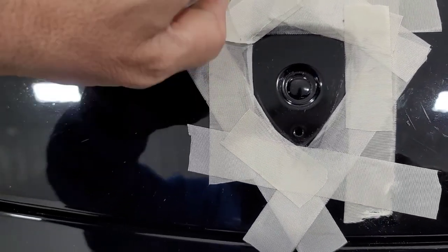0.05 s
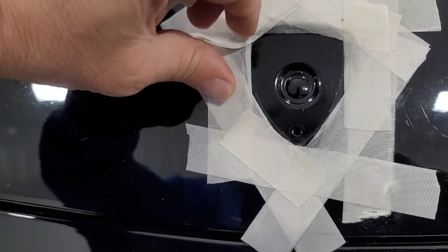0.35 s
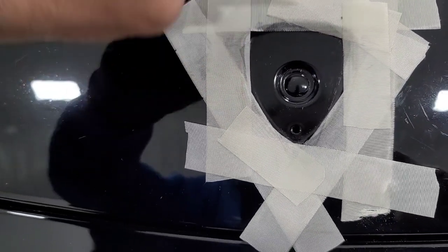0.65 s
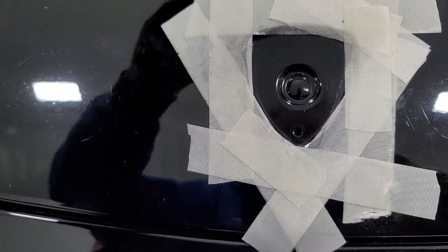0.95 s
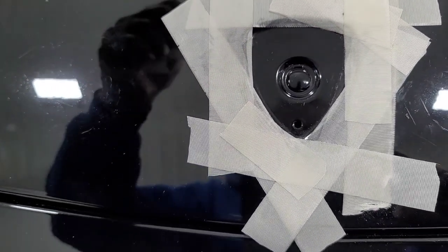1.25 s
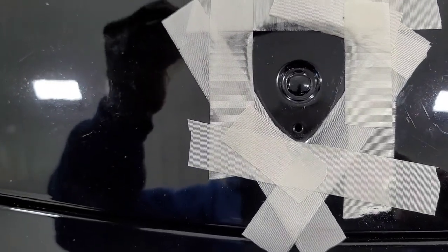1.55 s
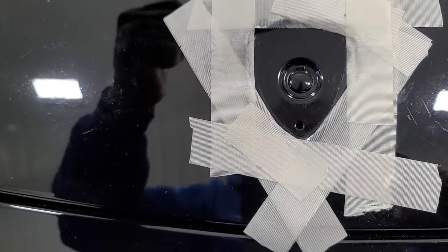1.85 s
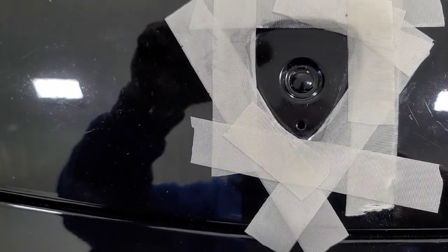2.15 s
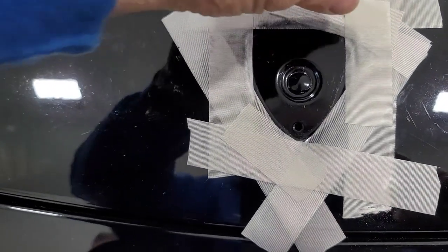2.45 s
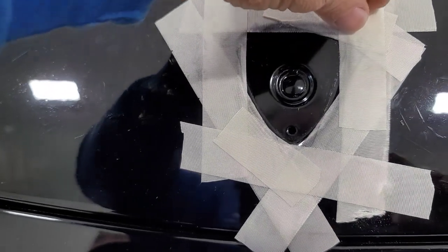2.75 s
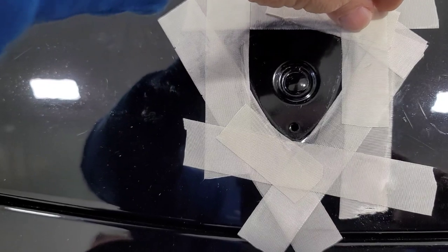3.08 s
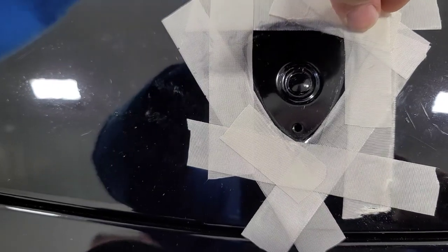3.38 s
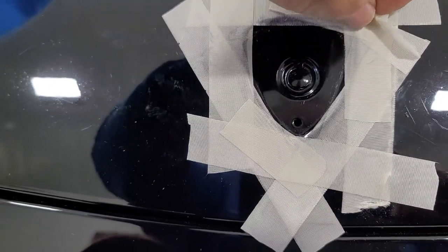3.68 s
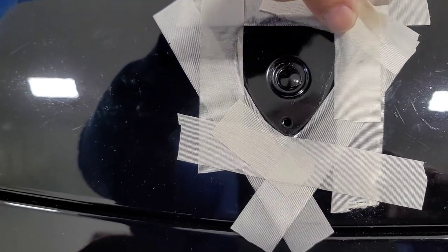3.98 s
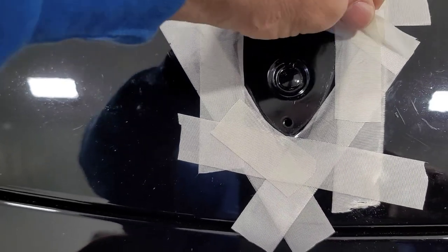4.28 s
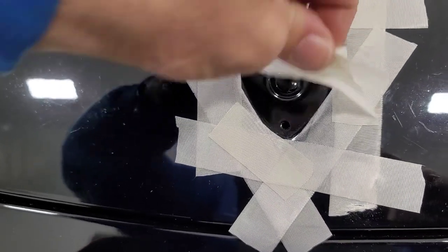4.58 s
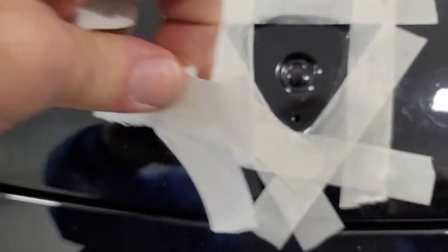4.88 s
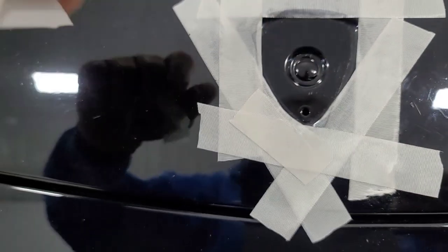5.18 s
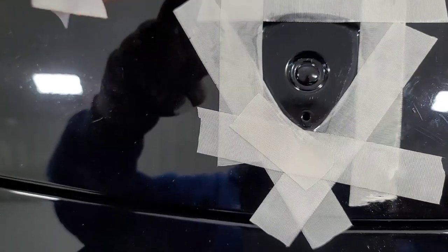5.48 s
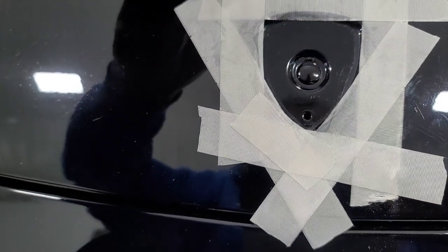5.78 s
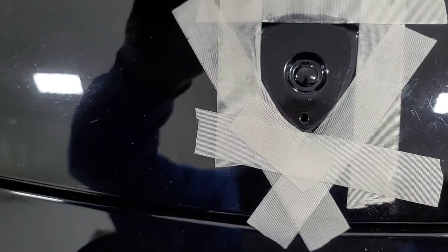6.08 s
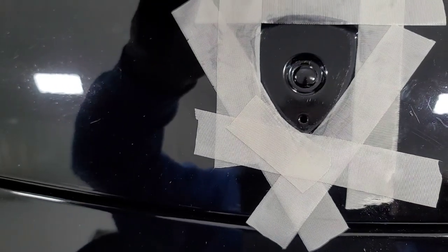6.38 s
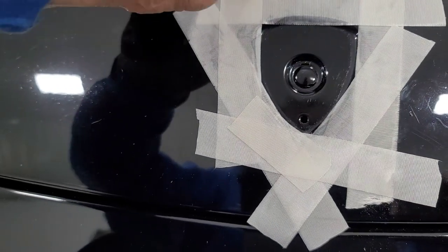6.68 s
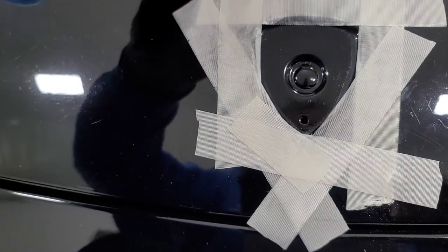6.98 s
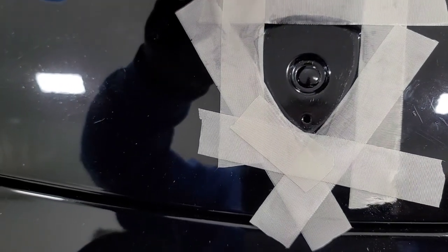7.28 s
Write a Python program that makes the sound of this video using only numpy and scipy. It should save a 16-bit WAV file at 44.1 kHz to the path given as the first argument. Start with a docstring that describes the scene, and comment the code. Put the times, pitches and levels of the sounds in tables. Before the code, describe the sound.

Close, irregular rips and crinkles of tape peeled from a car bonnet, fingers knocking the sheet metal in a quiet workshop.

```python
"""Peeling masking tape from a car bonnet

Tape is picked and ripped off sheet metal in a quiet workshop, close to two microphones. Fingers knock
the panel into its normal modes; the glue yields by stick-slip, in tiny jerks that drum it and crackle.
Between rips the strip is crumpled on the left, its creases buckling. A low rumble fills the room."""
import sys
import numpy as np
from scipy import signal
from scipy.fft import rfft, irfft
from scipy.io import wavfile
from scipy.ndimage import uniform_filter1d, map_coordinates

SR = 44100
rng = np.random.default_rng(int(sys.argv[2]) if len(sys.argv) > 2 else 0)


def log_audio(samples):
    """Write samples as a 16-bit WAV file to the path given in sys.argv[1]."""
    # one column per channel
    frames = np.atleast_2d(samples).T
    # limit to full scale, then quantise
    limited = np.clip(frames, -1, 1)
    pcm = np.round(limited * 32767).astype(np.int16)
    wavfile.write(sys.argv[1], SR, pcm)


N = 332514
TIME = np.arange(N) / SR
SIDES = np.array([[1], [-1]])  # left, right

# spectrum of creasing tape: f/Hz, level/dB
CREASE_SPECTRUM = [(400, -34.5), (1100, -6), (1500, -7), (2100, 5.5), (2800, -2.5), (3700, 4), (4800, -3),
                   (6500, -29), (12000, -19)]


def amp(db):
    """Amplitude ratio: a factor of ten per 20 dB."""
    return 10 ** (np.asarray(db) / 20)


def unit_rms(x):
    """Normalisation to a mean power of 1."""
    return x / np.sqrt(np.mean(x ** 2))


def unit_peak(x):
    """Normalisation to a mean channel peak of 1."""
    return x / np.abs(x).max(axis=-1).mean()


def decay(t, t60):
    """Exponential damping: 60 dB in t60 seconds."""
    return np.exp(-t * float(np.log(1000) / t60))


def add(out, start_s, sound):
    """Superposition of a short sound on out."""
    i = max(int(start_s * SR), 0)
    out[..., i:i + sound.shape[-1]] += sound[..., :N - i]


def convolve(x, response):
    """Linear filtering by convolution, cut to the length of x."""
    return signal.oaconvolve(np.atleast_2d(x), np.atleast_2d(response), axes=-1)[:, :x.shape[-1]]


def colour(spectrum, size=512):
    """Minimum-phase impulse response of a spectrum (f/Hz, level/dB), by folding the cepstrum."""
    hz, db = np.transpose(spectrum)
    bin_hz = np.arange(size // 2 + 1) * SR / size
    gain = amp(np.interp(np.log(bin_hz + 1), np.log(hz), db))
    cepstrum = irfft(np.log(gain))
    cepstrum[1:size // 2] *= 2
    cepstrum[size // 2 + 1:] = 0
    return irfft(np.exp(rfft(cepstrum)))


def steady(x, span_s):
    """Division by the running RMS holds a texture even over spans longer than span_s."""
    power = uniform_filter1d(np.mean(x ** 2, axis=0), int(span_s * SR) + 1)
    return x / np.sqrt(np.abs(power) + np.mean(x ** 2) / 10 ** 4)


def wander(times, points):
    """Random modulation: linear interpolation between Gaussian values spread over the scene."""
    return np.interp(times, np.linspace(0, N / SR, points), rng.standard_normal(points))


def strokes(starts, lengths, swells_db, levels_db, attack_s, release_s):
    """Envelope of hand movements, which add in power; attack and release are times per 20 dB."""
    power = np.zeros(N)
    for start, length, swell_db, db in zip(starts, lengths, swells_db, levels_db):
        span = slice(*np.searchsorted(TIME, [start - 2 * attack_s, start + length + 2 * release_s]))
        t = TIME[span] - start
        outside = np.maximum(-t, 0) / attack_s + np.maximum(t - length, 0) / release_s
        ramp_db = np.interp(t, [0, length], [-swell_db / 2, swell_db / 2])
        power[span] += amp(db + ramp_db - 20 * outside) ** 2
    return np.sqrt(power)


def background(air_db=-67.5, rumble_side_db=-17, air_side_db=-3):
    """Partial coherence: a rumble nearly alike at both microphones, under faint diffuse air noise."""
    # spectra of the rumble and the air noise: f/Hz, level/dB
    rumble_spectrum = [(12, -33.5), (20, -15.5), (38, -11), (54, 1.5), (68, -3.5), (86, -8), (163, -20.5),
                       (193, -21), (221, -22), (253, -27), (300, -23.5), (390, -72), (660, -120)]
    air_spectrum = [(120, -21), (200, -3.5), (304, -10), (358, -5.5), (497, -19), (641, -18), (874, -23),
                    (1480, -22), (7350, -39.5), (8050, -45.5), (15500, -41.5)]
    # slow drift of the rumble: t/s, level/dB
    rumble_levels = [(0, -51), (1, -53), (3.3, -50), (3.7, -48), (4.8, -48.5), (5.7, -53), (6.4, -52),
                     (6.7, -48), (7, -55)]
    rumble_db = np.interp(TIME, *np.transpose(rumble_levels))
    mid, side = unit_rms(convolve(rng.standard_normal((2, N)), colour(rumble_spectrum, size=8192)))
    rumble = (mid + amp(rumble_side_db) * SIDES * side) * amp(rumble_db)
    mid, side = unit_rms(convolve(rng.standard_normal((2, N)), colour(air_spectrum, size=2048)))
    air = (mid + amp(air_side_db) * SIDES * side) * amp(air_db)
    return rumble + air


def reverberation(direct, build_s=0.0034):
    """The workshop's diffuse field builds up quickly and decays at its own rate in each octave."""
    # octave bands of the room: f/Hz, level/dB, t60/s
    room_bands = [(200, -23.5, 2), (359, -13, 0.92), (742, -11.5, 1.08), (1580, -16, 1.3),
                  (3100, -17.5, 0.97), (6500, -17, 0.91), (12800, -17.5, .3)]
    t, response = np.arange(SR) / SR, 0
    for hz, db, t60 in room_bands:
        edges = np.minimum(hz * np.sqrt([.5, 2]), SR / 2 - 10)
        bandpass = signal.butter(2, edges, "band", fs=SR, output="sos")
        band = signal.sosfilt(bandpass, rng.standard_normal((2, SR)))
        envelope = decay(t, t60) * (1 - np.exp(-t / build_s))
        response = response + amp(db) * band * envelope / np.linalg.norm(envelope)
    return convolve(direct, response)


def microphones(x):
    """Frequency response of the ports: the right favours the middle range, the left the treble."""
    # port responses: f/Hz, level/dB
    left_port = [(1000, -3.8), (4000, -3.7), (9000, -0.9), (15000, 1)]
    right_port = [(1000, -5), (4000, -0.5), (9000, -2.8), (15000, 0.5)]
    return convolve(x, [colour(left_port), colour(right_port)])


def arrival_delays(times, stray_ms=0):
    """Path difference: sound from the hands reaches the far microphone later (left, right delay/s)."""
    # bearing of the hands: t/s, lag of the right microphone/ms
    hand_lags = [(0, 0.2), (.75, 0.36), (1.2, 0.39), (2.3, 0.49), (2.6, -0.27), (4.7, -0.49), (4.95, 0.32),
                 (6.9, 0.53), (7.3, 0.096)]
    lag_s = (np.interp(times, *np.transpose(hand_lags)) + stray_ms) / 1000
    return np.maximum([-lag_s, lag_s], 0)


def from_hands(x, share=1):
    """A moving source: each channel is delayed by a share of its changing arrival delay."""
    return np.array([map_coordinates(channel, [np.arange(N) - share * delay * SR], order=3)
                     for channel, delay in zip(x, arrival_delays(TIME))])


def grains(low_hz, high_hz, t60, spread_db, cluster_db, ripple_db, stray_ms, count, size):
    """Shot noise of tiny damped pops, each with its own pitch and place, swelling in clusters."""
    when, pitch = rng.random((count, 2)).T
    strength, place, side = np.clip(rng.standard_normal((count, 3)), -2, 2).T
    start = (when * (N - size)).astype(int)
    times, hz = start / SR, low_hz + pitch * (high_hz - low_hz)
    db = spread_db * strength + cluster_db * wander(times, points=900)
    # the favoured pitches shift as the tape bends
    db = db + ripple_db * np.cos(2 * np.pi * hz / 1400 + 2 * wander(times, points=110))
    gain = amp(db + 2 * side * SIDES)
    delays = arrival_delays(times, stray_ms * place)
    t = np.maximum(np.arange(size) / SR - delays[..., None], 0).astype(np.float32)
    omega = (2 * np.pi * hz[:, None]).astype(np.float32)
    pops = np.sin(omega * t) * decay(t, t60) * gain[..., None]
    samples = (start[:, None] + np.arange(size)).ravel()
    return np.array([np.bincount(samples, channel.ravel(), N) for channel in pops])


def crumpling(attack_s=0.027, release_s=0.023):
    """Buckling and friction: each squeeze pops small creases and rubs the paper back on itself."""
    # squeezes of the loose strip: t/s, length/s, crinkle level/dB, hiss level/dB, swell/dB
    squeezes = [(0.854, 0.046, -61, -61.5, 0.5), (0.99, 0.0079, -57, -52.5, 2.5),
                (1.08, 0.065, -53, -58, 6.5), (1.188, 0.022, -45, -51, -6), (1.222, 0.0083, -35, -45, -5.5),
                (1.354, 0.056, -56.5, -58.5, -12), (1.43, 0.084, -51, -52, 12),
                (1.632, 0.068, -52.5, -51.5, -14.5), (1.711, 0.12, -52.5, -52, 6.5),
                (1.855, 0.046, -72, -62, -4), (1.947, 0.013, -42.5, -45.5, -13),
                (2.15, 0.04, -51, -60.5, 1), (2.392, 0.1, -67, -83, -11), (4.866, 0.034, -49.5, -56.5, 7),
                (4.967, 0.16, -60, -62, -3), (5.122, 0.035, -47, -47.5, 2), (5.172, 0.12, -55.5, -51, -0.5),
                (5.34, 0.039, -53.5, -58.5, 8), (5.388, 0.035, -43.5, -48.5, 7.5),
                (5.458, 0.033, -52.5, -56, 12.5), (5.575, 0.041, -52, -59.5, 0),
                (5.655, 0.037, -61, -67.5, 7), (5.841, 0.02, -67.5, -79, -1),
                (6.527, 0.24, -77.5, -82, -14)]
    # spectrum of rubbing paper: f/Hz, level/dB
    hiss_spectrum = [(2500, -11.5), (4500, -4), (6000, -3), (8000, -6.5), (11000, -12), (16000, -19)]
    starts, lengths, crinkle_db, hiss_db, swells_db = np.transpose(squeezes)
    envelope = lambda db: strokes(starts, lengths, swells_db, db, attack_s, release_s)
    creases = grains(1110, 6350, t60=0.003, spread_db=-1.5, cluster_db=4.0, ripple_db=1.5,
                     stray_ms=0.098, count=22000, size=144)
    rubbing = grains(2270, 15700, t60=0.00085, spread_db=3, cluster_db=2, ripple_db=-4.0,
                     stray_ms=0.086, count=50000, size=48)
    crinkle = steady(convolve(creases, colour(CREASE_SPECTRUM)), span_s=0.058) * envelope(crinkle_db)
    hiss = steady(convolve(rubbing, colour(hiss_spectrum)), span_s=0.12) * envelope(hiss_db)
    return crinkle + hiss


def snaps(fold_t60=0.01, overtone_ratio=1.914, overtone_db=-1, tick_t60=0.00074,
          strain_s=0.0025, strain_db=-12, settle_db=-14, settle_t60=0.034, size=2048):
    """Snap-through: a larger fold strains, flips with a tick and a pop, and its neighbours settle."""
    # the tape buckles or snaps free: t/s, pop level/dB, tick level/dB, pop f/Hz
    folds = [(0.1739, -36.5, -31.5, 1520), (0.1961, -35, -40, 1880), (0.318, -43, -32.5, 2210),
             (0.9936, -31, -62.5, 1850), (1.1295, -38, -28, 2110), (1.1801, -19.5, -37, 2250),
             (1.2231, -17.5, -23, 2170), (1.241, -26, -23.5, 2100), (1.491, -37, -51, 2280),
             (1.5074, -27.5, -51, 2200), (1.7904, -32, -20.5, 1900), (1.9326, -20.5, -40, 2010),
             (1.9464, -23, -24.5, 1920), (2.075, -62, -44, 2180), (2.2131, -18.5, -49, 2180),
             (2.2423, -34, -56, 1930), (2.4336, -45, -52, 2440), (3.075, -53, -43, 1460),
             (3.5119, -33, -28.5, 1800), (3.5187, -35, -31, 1980), (3.582, -53, -41, 2050),
             (3.9435, -40, -28.5, 1830), (4.3435, -47, -33, 1580), (4.3984, -40, -31.5, 2070),
             (4.537, -23, -20, 1750), (4.642, -18.5, -24, 1670), (5.0278, -36, -35.5, 2820),
             (5.1477, -21, -23.5, 1800), (5.3102, -28, -56, 2070), (5.419, -21.5, -27, 2260),
             (5.593, -33.5, -54, 2170), (6.493, -34, -52, 1690), (6.779, -46, -45, 1810),
             (7.235, -47.5, -41.5, 1970), (7.3018, -22.5, -30, 1830)]
    # spectrum of the tick: f/Hz, level/dB
    tick_spectrum = [(1500, -22), (4000, 7), (6000, 2), (10000, -2.5), (15500, -4)]
    out = np.zeros((2, N))
    t = (np.arange(size) - size // 4) / SR  # zero at the flip
    after = np.maximum(t, 0)
    strain = amp(strain_db) * np.exp(-np.abs(t) / strain_s)
    settling = amp(settle_db) * decay(after, settle_t60)
    unrest = np.where(t < 0, strain, settling)
    for flip_s, pop_db, tick_db, hz in folds:
        phase = 2 * np.pi * hz * after
        overtone = np.sin(overtone_ratio * phase) * decay(after, fold_t60 / overtone_ratio)
        pop = unit_peak(np.sin(phase) * decay(after, fold_t60) + amp(overtone_db) * overtone)
        creak = unrest * unit_peak(convolve(rng.standard_normal((2, size)), colour(CREASE_SPECTRUM)))
        burst = rng.standard_normal(size) * decay(after, tick_t60) * (t >= 0)
        rustle = unrest * rng.standard_normal((2, size)) / 2
        tick = unit_peak(convolve(burst + rustle, colour(tick_spectrum)))
        add(out, flip_s + t[0], amp(pop_db) * (pop + 2 * creak) + amp(tick_db) * tick)
    return from_hands(out)


def modal_response(modes, phase_gap_rad, size=16384):
    """Sum of damped normal modes, each leading in phase at the left or right microphone by turns."""
    t = np.arange(size) / SR
    response = 0
    for k, (hz, db, t60) in enumerate(modes):
        polarity = (-1) ** (k // 2)
        offset = (-1) ** k * phase_gap_rad * SIDES / 2
        response = response + polarity * amp(db) * decay(t, t60) * np.sin(2 * np.pi * hz * t + offset)
    return response


def bonnet(dense_db=-1, dense_t60=0.079):
    """Impulse responses of a plate: a deep boom, and a ring whose weak modes overlap into noise."""
    # deep and upper modes of the sheet: f/Hz, level/dB, t60/s
    boom_modes = [(68, -13.5, 0.51), (85.7, -7, 0.11), (200, -7, 0.37), (239.7, -19, 1), (341, -28, 0.5),
                  (354.1, 1, 0.12), (387.6, -18.5, 0.24)]
    ring_modes = [(519.3, -0.5, 0.044), (558, 2.5, 0.068), (624, 2, 0.028), (700, -5, 0.066),
                  (772.3, -6, 0.15), (819.7, -4.5, 0.092), (973, -13.5, 0.11), (1033, -7.5, 0.16),
                  (1180, -6.5, 0.028), (1360, -21.5, 0.043), (1587, -18.5, 0.12), (1678, -10, 0.013),
                  (1815, -12.5, 0.026), (2170, -32.5, 0.077)]
    # spectrum of the dense weak modes: f/Hz, level/dB
    dense_spectrum = [(250, -42.5), (480, 3), (750, -3), (1100, -0.5), (1800, -15), (2700, -27),
                      (5000, -33.5), (16000, -66)]
    boom = modal_response(boom_modes, phase_gap_rad=0.22)
    ring = modal_response(ring_modes, phase_gap_rad=1.0)
    t = np.arange(ring.shape[1]) / SR
    dense = unit_rms(convolve(rng.standard_normal(ring.shape), colour(dense_spectrum)))
    return boom, ring + amp(dense_db) * dense * decay(t, dense_t60)


def knocks(boom, ring, push_s=0.0018, scuff_db=-27, scuff_t60=0.15, touch_t60=0.25, spot_db=7):
    """Soft impact: a fingertip eases the deep modes in and scuffs the upper; the spot weights them."""
    # fingers and tugs on the panel: t/s, boom level/dB, ring level/dB, f/Hz that the spot favours
    impacts = [(0.001, -33, -38, 364), (0.175, -35, -33, 350), (0.395, -44, -45.5, 625),
               (0.443, -37.5, -39.5, 460), (0.484, -68, -36, 355), (0.495, -29.5, -35.5, 500),
               (0.638, -27, -31.5, 348), (0.675, -18.5, -20, 330), (2.613, -41.5, -45.5, 352),
               (2.735, -47, -46.5, 350), (2.749, -36.5, -43, 330), (2.823, -39.5, -36, 750),
               (3.0704, -38.5, -20.5, 750), (3.079, -29, -29.5, 1040), (3.463, -47, -63, 350),
               (3.513, -39, -48, 350), (3.557, -43.5, -56, 362), (3.594, -39.5, -53.5, 383),
               (3.694, -41, -66, 347), (3.941, -38, -47.5, 360), (4.181, -36, -32.5, 640),
               (4.192, -32.5, -27.5, 700), (4.537, -23, -50, 560), (4.63, -28, -22, 825),
               (4.7, -52, -12, 490), (6.068, -43.5, -43.5, 1110), (6.55, -35.5, -42, 200),
               (6.778, -37, -41.5, 353), (7.03, -47, -51.5, 970), (7.047, -39.5, -47.5, 364)]
    # spectrum of the fingertip's contact: f/Hz, level/dB
    fingertip_spectrum = [(450, -2), (750, 4), (1100, -4), (2000, -0.5), (5000, 6)]
    deep, upper = np.zeros((2, 2, N))
    t = np.arange(ring.shape[1]) / SR
    finger_ring = convolve(ring, colour(fingertip_spectrum))
    for start_s, boom_db, ring_db, hz in impacts:
        spot = colour([(hz / np.sqrt(2), 0), (hz, spot_db), (hz * np.sqrt(2), 0)], size=2048)
        thud = convolve(boom, spot) * (1 - np.exp(-t / push_s)) * decay(t, t60=1.0)
        contact = (t == 0) + amp(scuff_db) * rng.standard_normal(len(t)) * decay(t, scuff_t60)
        tap = convolve(convolve(contact, spot), finger_ring) * decay(t, touch_t60)
        add(deep, start_s, amp(boom_db) * unit_peak(thud))
        add(upper, start_s, amp(ring_db) * unit_peak(tap))
    return deep, upper


def slips(per_second, spread_db):
    """Poisson process: the glue's tiny releases as impulses of random sign and uneven size."""
    impulses = (rng.random(N) < per_second / SR) * rng.choice([-1, 1], N)
    sizes = amp(spread_db * np.clip(rng.standard_normal(N), -2, 2))
    return unit_rms(impulses * sizes)


def ring_out(drive, t60):
    """Energy storage: the envelope of a vibration dies away exponentially after its drive stops."""
    retained = decay(1 / SR, t60) ** 2
    return np.sqrt(signal.lfilter([1 - retained], [1, -retained], drive ** 2))


def peeling(boom, ring, attack_s=0.019, release_s=0.012, spread_db=3.5):
    """Stick-slip: the glue lets go in jerks that drive the panel, while its fine threads crackle."""
    # light picks to full rips: t/s, length/s, boom level/dB, ring level/dB, crackle level/dB, swell/dB
    pulls = [(0.002, 0.14, -61, -64.5, -73, -13), (0.163, 0.083, -51, -67, -63.5, -11),
             (0.384, 0.015, -62, -56, -69, 6), (0.479, 0.024, -41, -61, -64.5, -8),
             (0.629, 0.03, -34, -38.5, -48.5, 1.5), (0.673, 0.069, -26, -31.5, -45, -5),
             (2.715, 0.11, -49.5, -65, -78, 0), (3.3, 0.16, -74, -69.5, -75, 3),
             (3.506, 0.033, -73, -54, -52, -2), (3.647, 0.18, -65, -67.5, -62.5, -5.5),
             (4.037, 0.023, -85, -72, -66, -3), (4.119, 0.048, -56, -58.5, -72, -3),
             (4.188, 0.11, -42, -55.5, -68.5, -2.5), (4.272, 0.05, -52, -60, -61, 2),
             (4.329, 0.23, -56, -50, -55, -3), (4.534, 0.11, -31.5, -32.5, -46, -3),
             (4.635, 0.069, -34, -25.5, -45.5, 0.5), (7.416, 0.16, -51, -57.5, -58.5, 16)]
    # spectra of the glue's force on the panel and of its crackle: f/Hz, level/dB
    force_spectrum = [(60, -10.5), (200, -10), (350, 4), (550, -1.5), (850, 1.5), (1100, -3), (1700, 5.5)]
    crackle_spectrum = [(600, -14), (1500, 9), (2700, -0.5), (4000, 8), (5500, 3), (8000, -1),
                        (12000, -2.5), (16000, -13)]
    starts, lengths, boom_db, ring_db, crackle_db, swells_db = np.transpose(pulls)
    envelope = lambda db: strokes(starts, lengths, swells_db, db, attack_s, release_s)
    releases = np.array([slips(per_second=900, spread_db=spread_db) for _ in range(3)])
    jerks, *side_jerks = convolve(releases, colour(force_spectrum, size=2048))
    # the peel line is wide, so each microphone also gets jerks of its own
    wide_jerks = jerks + 0.58 * np.array(side_jerks)
    threads = grains(1000, 16800, t60=0.00029, spread_db=spread_db, cluster_db=-0.5, ripple_db=-2.5,
                     stray_ms=0.166, count=60000, size=44)
    deep = steady(convolve(jerks, boom), span_s=0.0306) * ring_out(envelope(boom_db), t60=0.27)
    upper = steady(convolve(wide_jerks, ring), span_s=0.029) * ring_out(envelope(ring_db), t60=0.049)
    crackle = steady(convolve(threads, colour(crackle_spectrum)), span_s=0.03) * envelope(crackle_db)
    return deep, upper, crackle


def scene(boom_pan_db=-0.5, ring_pan_db=-5.5):
    """Superposition of the direct sound of panel and tape, its reverberation and the background."""
    boom, ring = bonnet()
    peel_boom, peel_ring, crackle = peeling(boom, ring)
    knock_boom, knock_ring = knocks(boom, ring)
    deep = (peel_boom + knock_boom) * amp(boom_pan_db * SIDES / 2)
    # the whole sheet radiates, so its ring follows the hands only in part
    upper = from_hands(peel_ring + knock_ring, share=0.59) * amp(ring_pan_db * SIDES / 2)
    direct = deep + upper + microphones(crackle + crumpling() + snaps())
    return direct + reverberation(direct) + background()


def record(dry, cutoff_hz=15800):
    """Band limiting: a steep elliptic low-pass cuts the top of the treble."""
    return signal.sosfilt(signal.ellip(10, .2, 70, cutoff_hz, fs=SR, output="sos"), dry)


dry = scene()
out = record(dry)
log_audio(out)
```